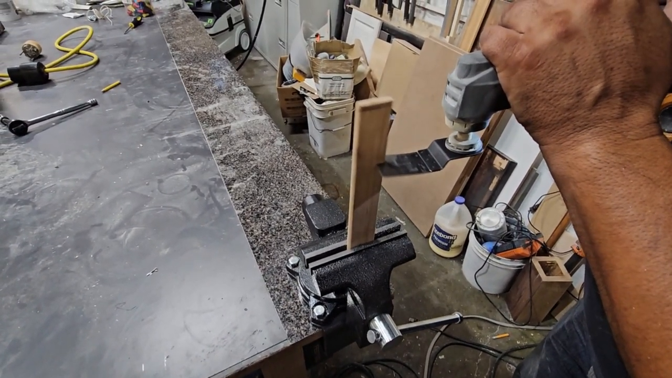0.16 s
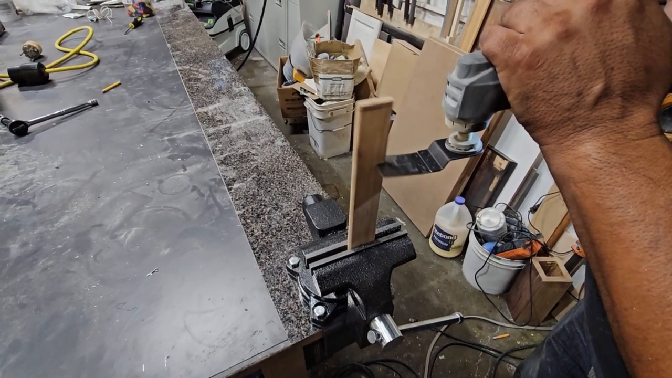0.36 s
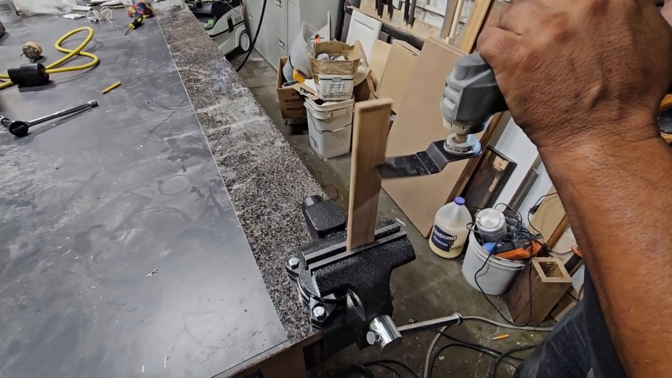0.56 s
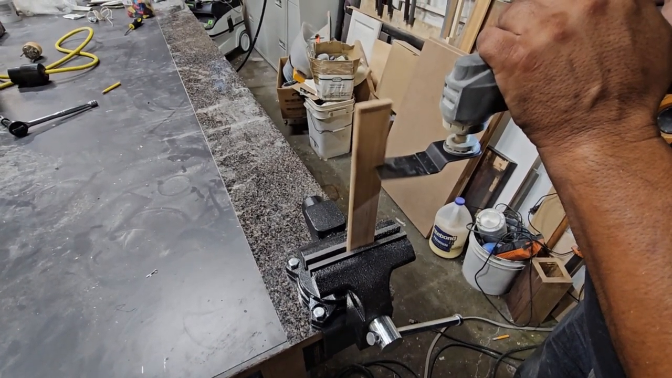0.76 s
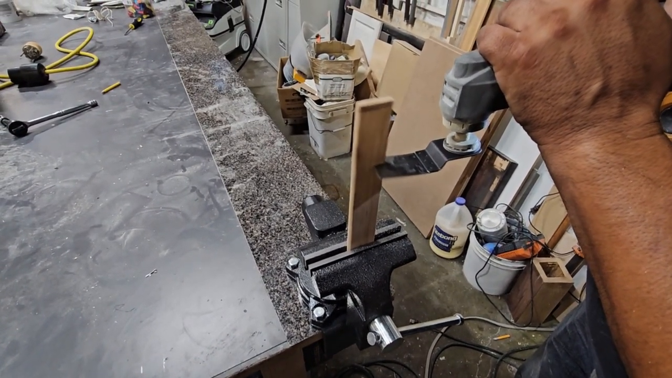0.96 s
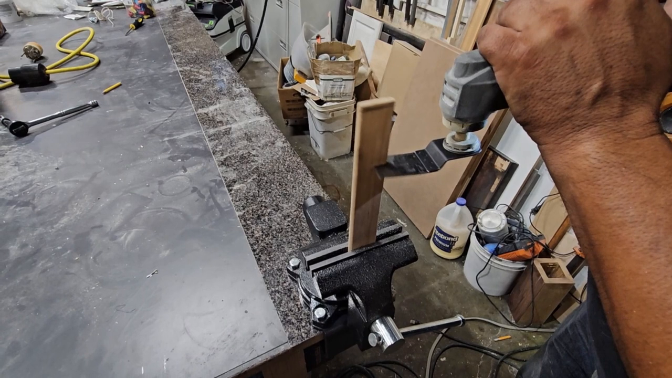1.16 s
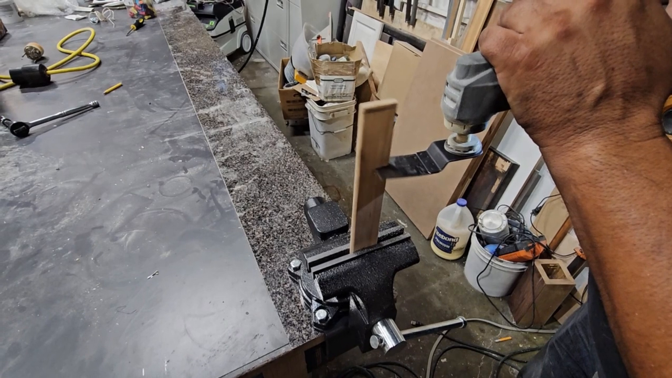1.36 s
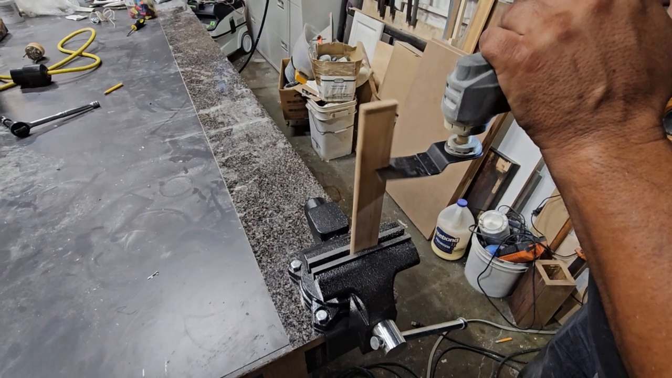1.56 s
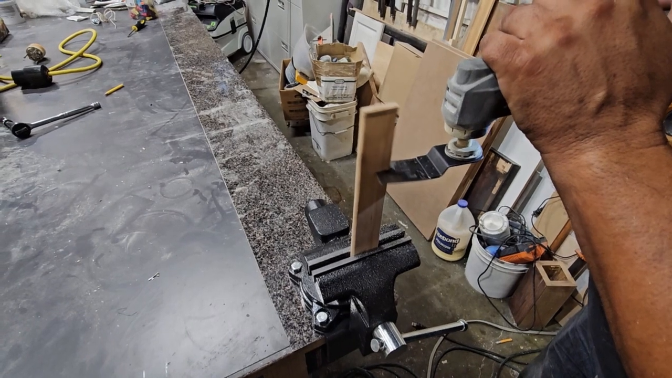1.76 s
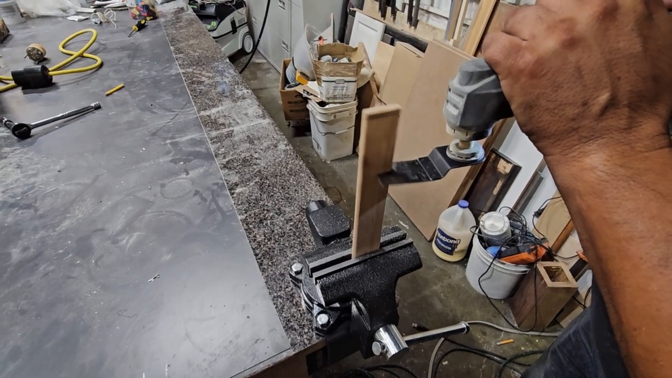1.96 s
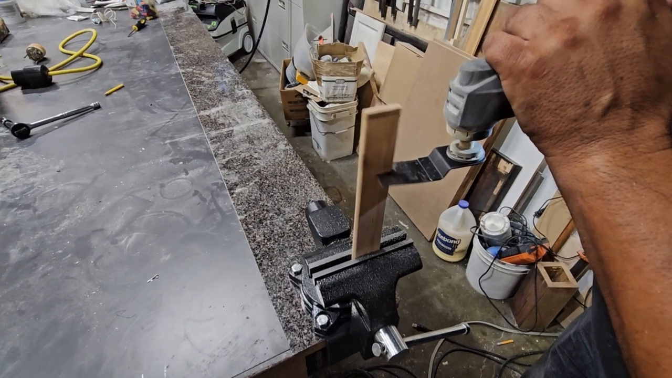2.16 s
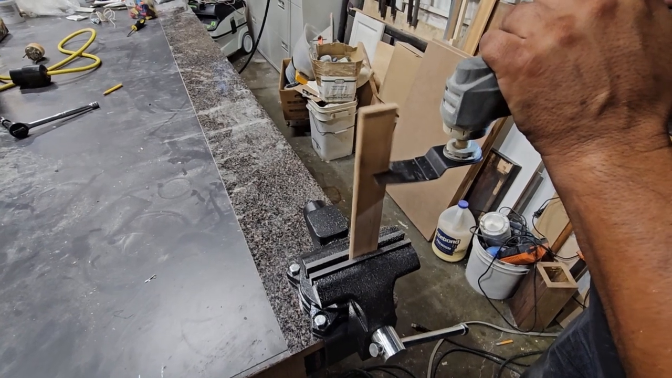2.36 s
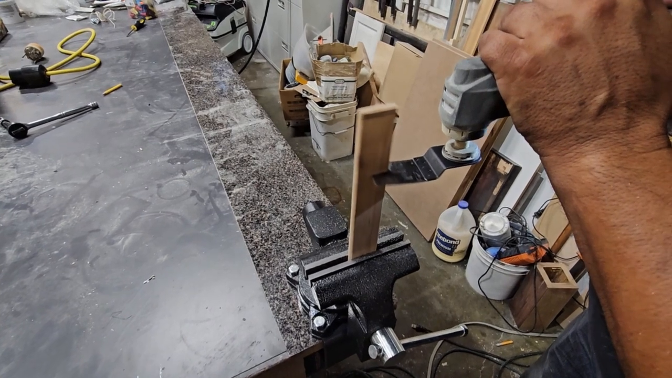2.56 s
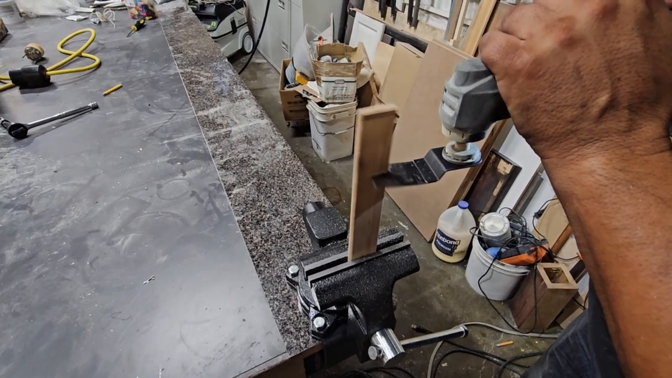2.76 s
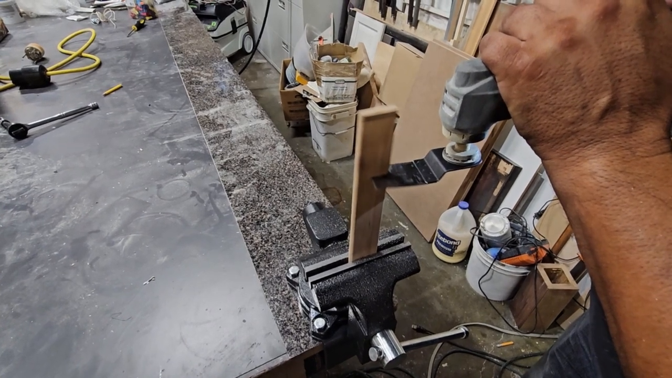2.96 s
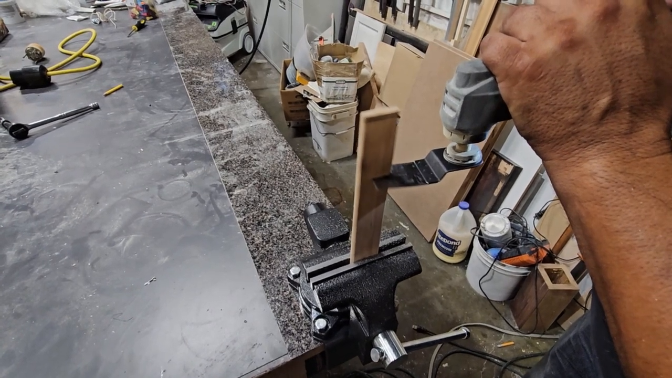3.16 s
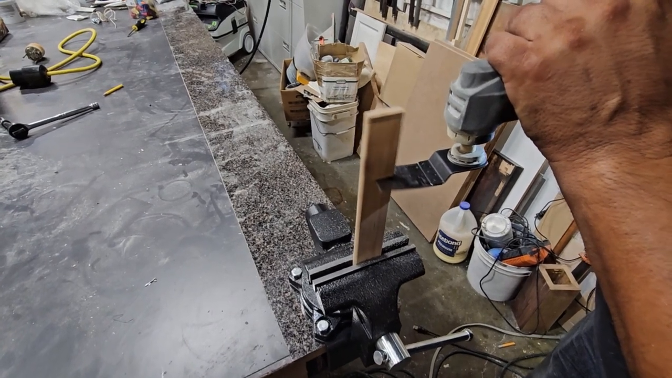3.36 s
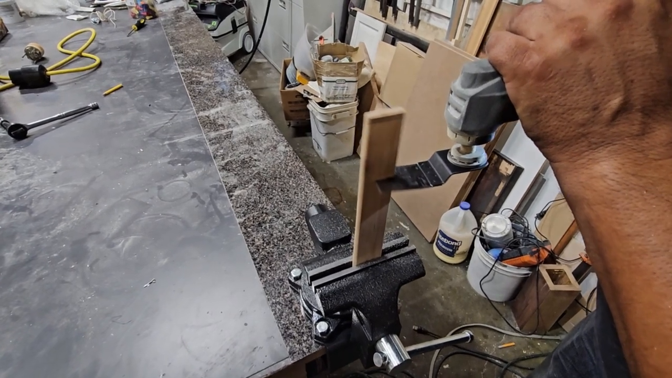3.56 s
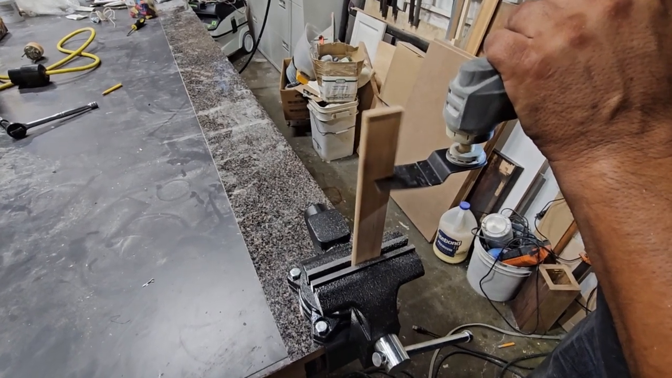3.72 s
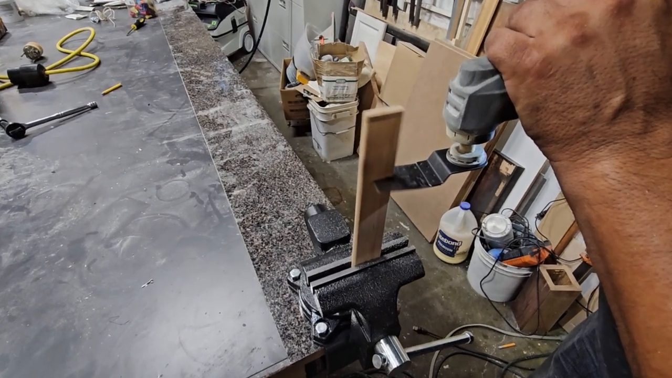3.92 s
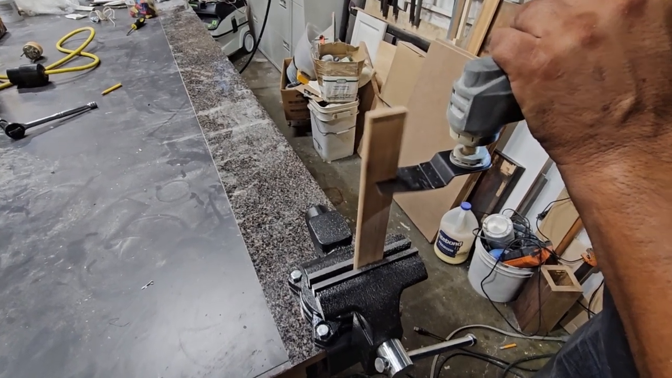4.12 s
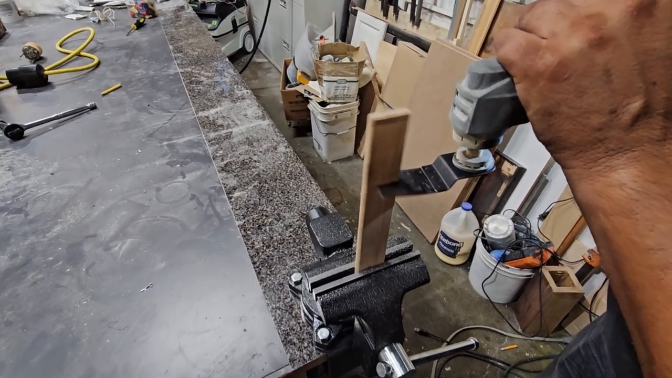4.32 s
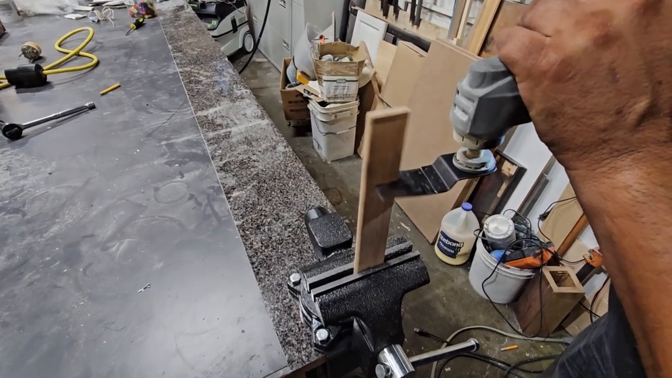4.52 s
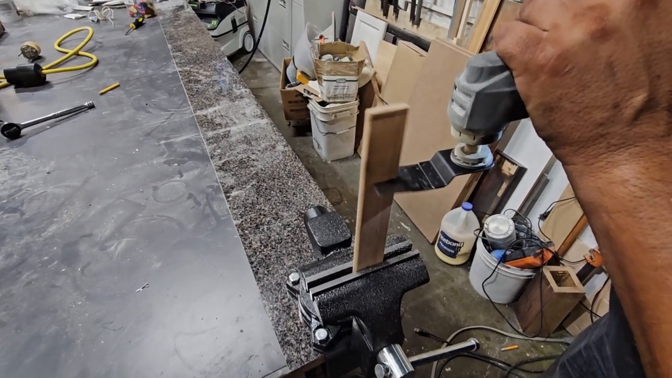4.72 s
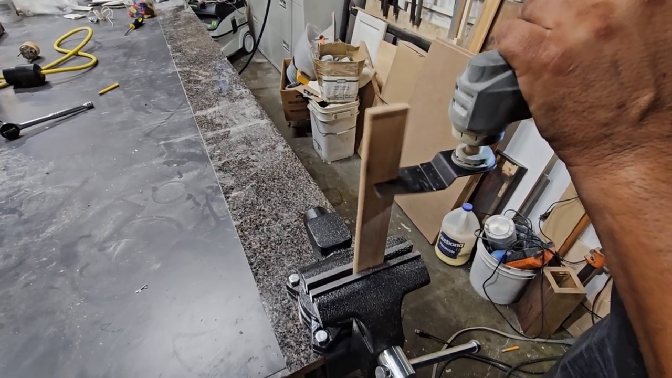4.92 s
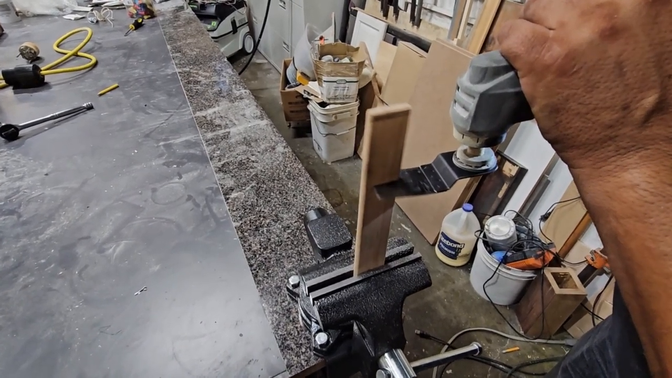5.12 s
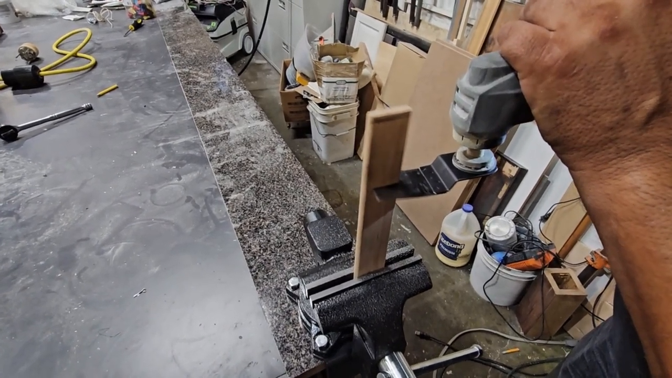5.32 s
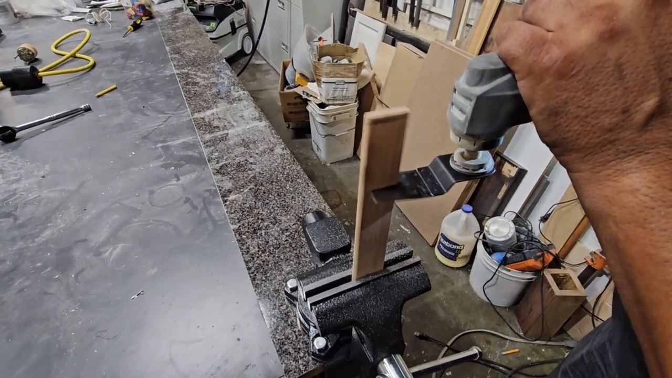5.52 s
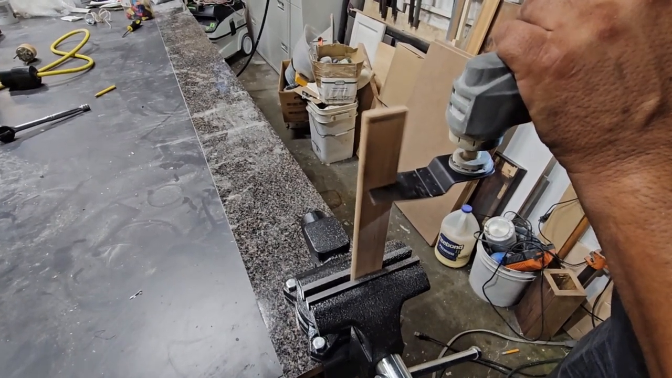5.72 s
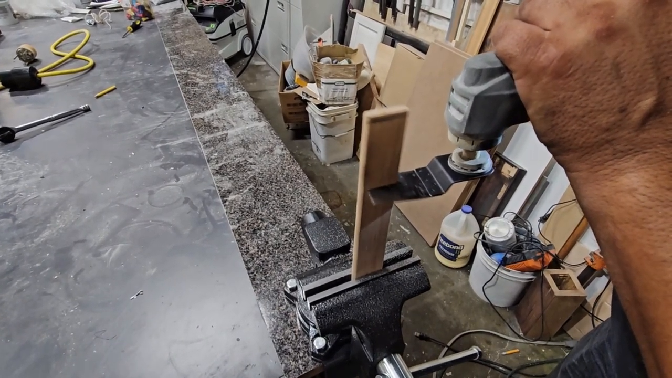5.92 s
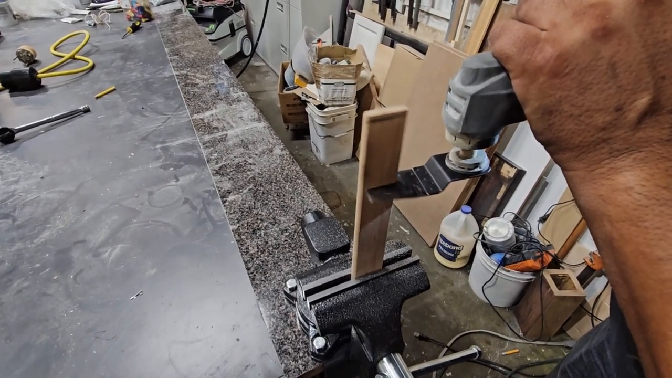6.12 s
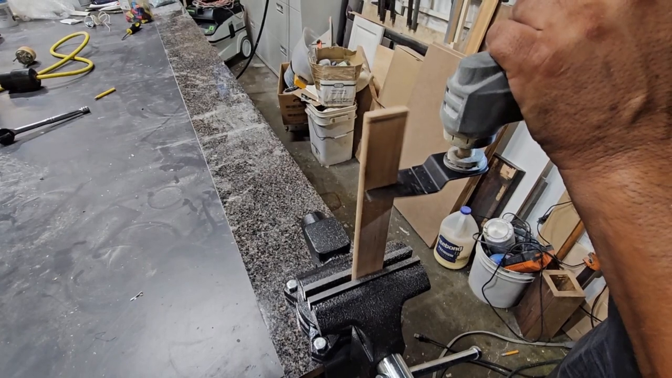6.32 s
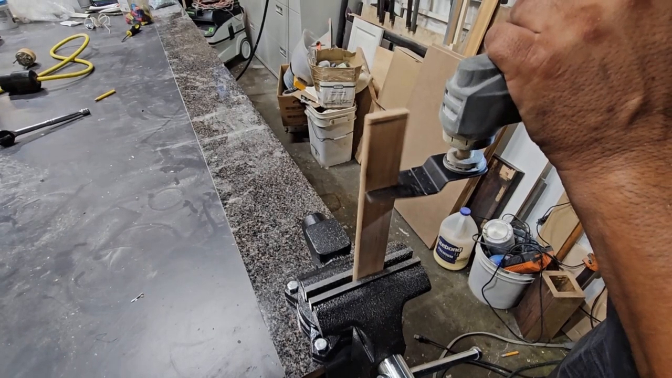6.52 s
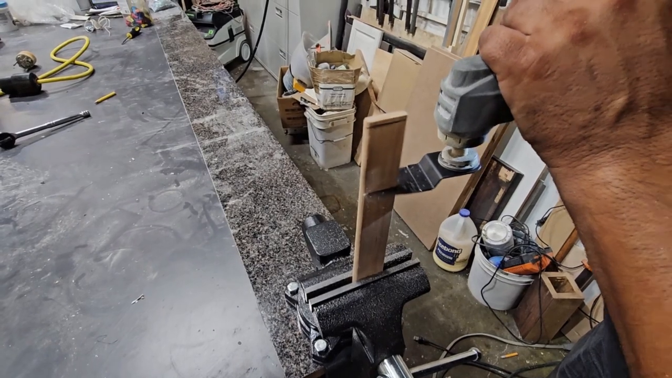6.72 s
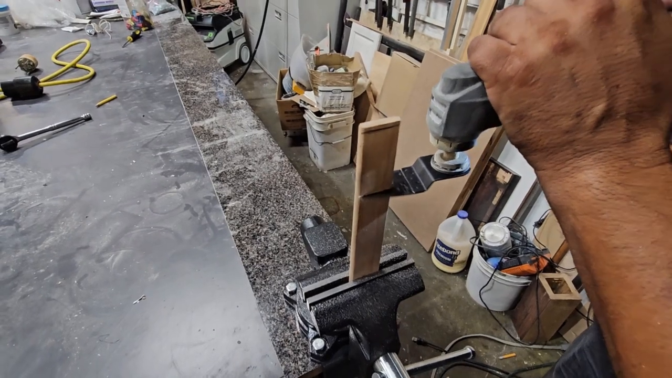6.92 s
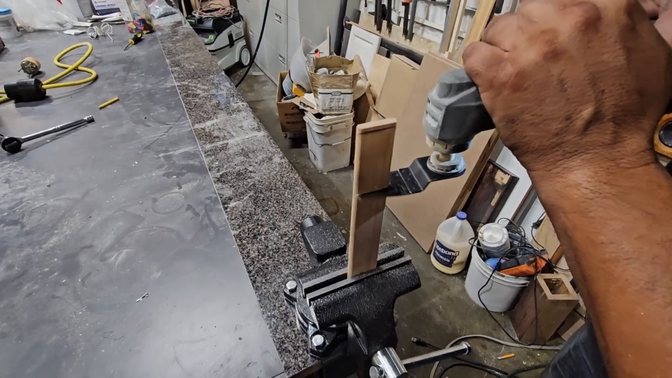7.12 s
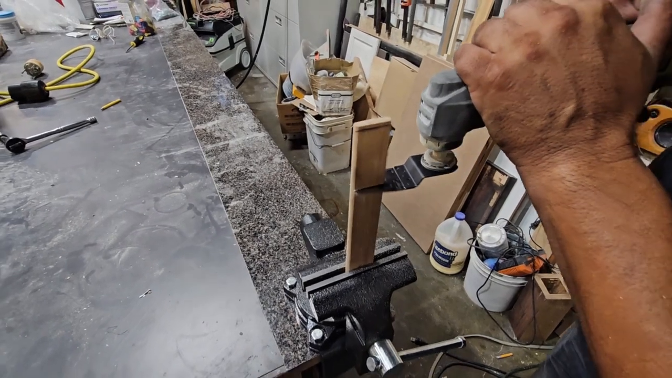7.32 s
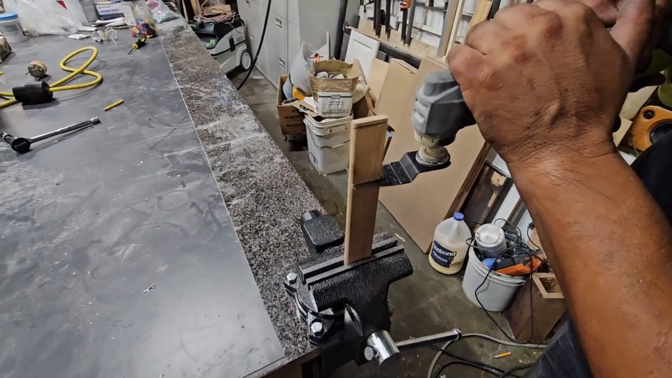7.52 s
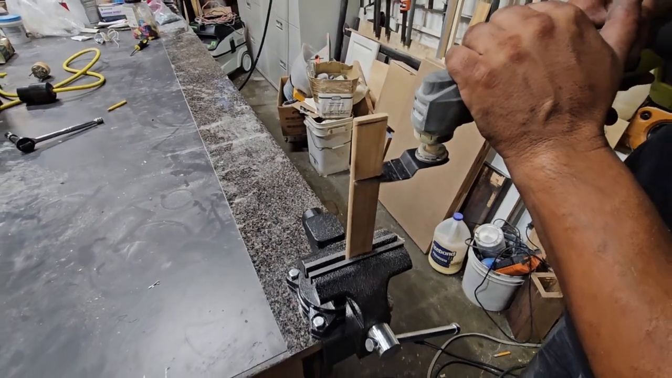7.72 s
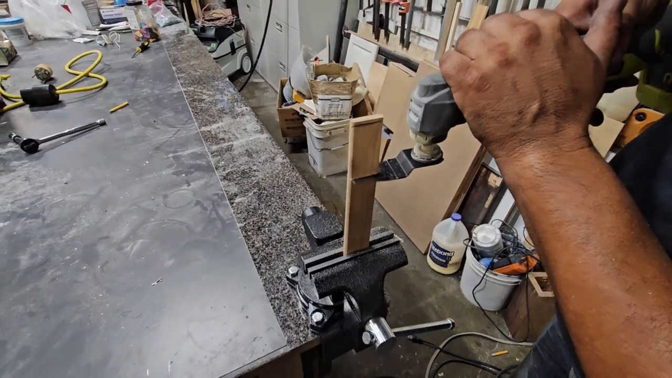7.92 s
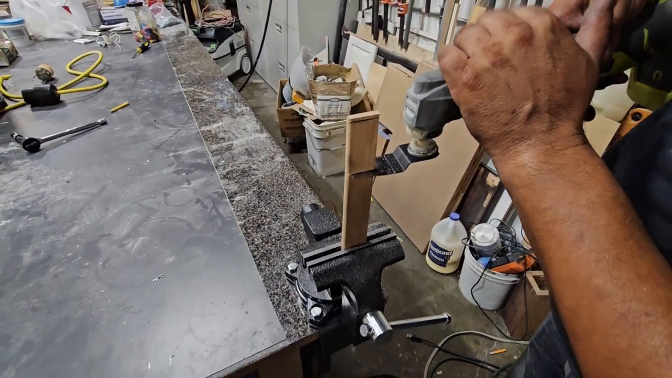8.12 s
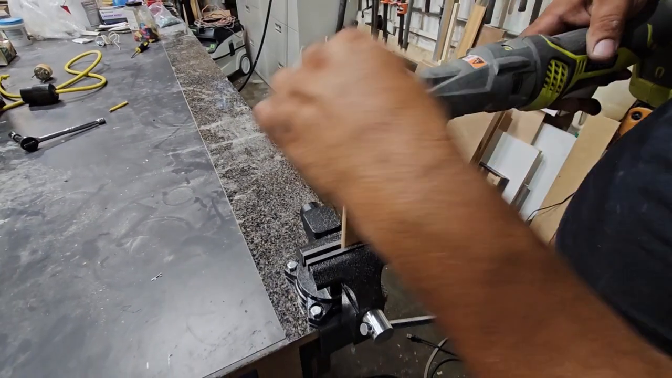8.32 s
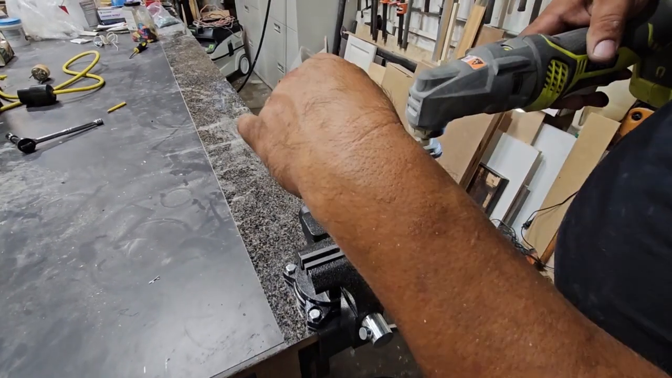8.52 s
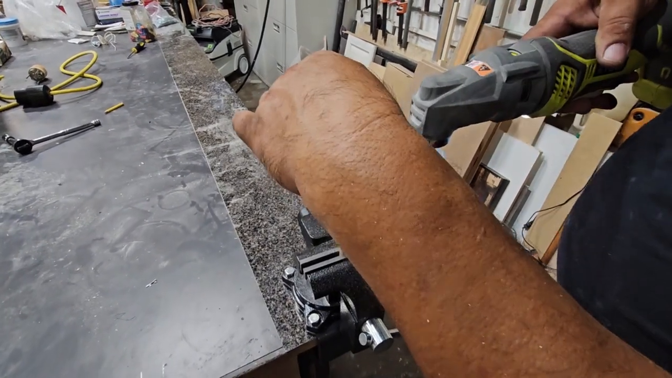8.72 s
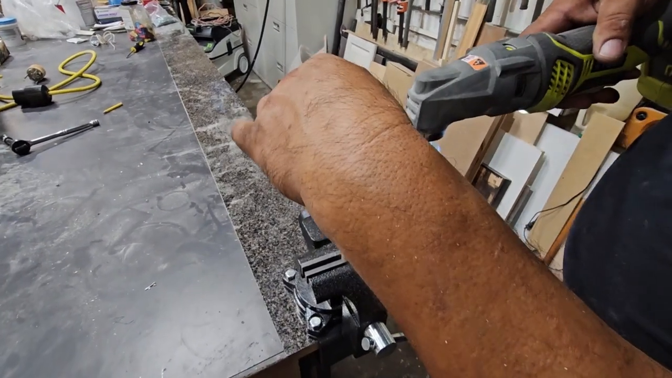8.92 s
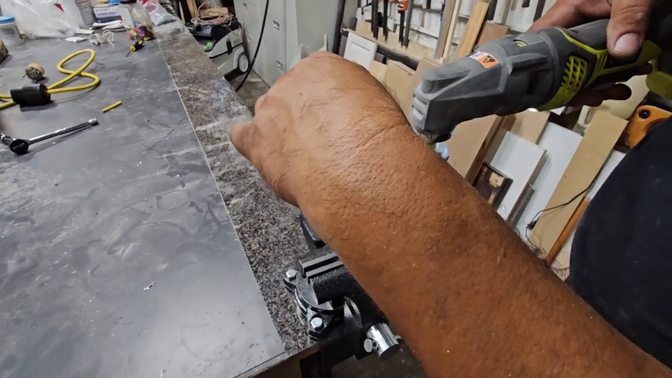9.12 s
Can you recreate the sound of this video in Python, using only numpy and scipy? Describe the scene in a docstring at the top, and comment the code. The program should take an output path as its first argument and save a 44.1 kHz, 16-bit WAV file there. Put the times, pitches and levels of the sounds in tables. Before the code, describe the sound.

A close stereo microphone catches a harsh electric rasp: fast blade strokes, hissing teeth and a humming wooden slat, with dull thuds through the bench. The bright ringing gradually sinks in pitch. After about six and a half seconds the blade comes loose, buzzes hollowly and coasts down. A brief quiet with faint clicks ends when the motor abruptly spins up again, unloaded, in a dry small room.

```python
"""In a small workshop, close by, an oscillating multi-tool saws into a wooden slat held in a vise.
The blade swings about 250 times a second: pulses and scraping noise pass through sliding resonances
for the rasp, and waves at the swing rate make the slat hum. The resonances mostly sink as it goes deeper.
The blade comes free, the motor coasts towards a stop, and the tool starts again in the air.
Thuds, squeals, rings, small clicks and a quiet room tone are added around the sawing."""
import sys
import numpy as np
from scipy import signal
from scipy.fft import rfft, irfft, next_fast_len
from scipy.io import wavfile
from scipy.ndimage import uniform_filter1d

SR = 44100
rng = np.random.default_rng(int(sys.argv[2]) if len(sys.argv) > 2 else 0)


def generate_wav(sig):
    """Save sig (samples, or channels by samples) to the path in sys.argv[1] as 16-bit PCM at SR."""
    pcm = np.round(np.clip(np.atleast_2d(sig).T, -1, 1) * 32767).astype(np.int16)
    wavfile.write(sys.argv[1], SR, pcm)


N = 408807
TIME = np.arange(N) / SR
BINS = np.fft.rfftfreq(512, 1 / SR)  # Hz


def gain_of(db):
    """Turns decibels into amplitude."""
    return 10 ** (np.asarray(db) / 20)


def evened(x):
    """Scales to an rms of 1."""
    return x / np.sqrt(np.mean(x ** 2) + 1e-20)


def follow(rows, t=TIME):
    """Reads each column of a curve at the times t, with straight lines between its points."""
    s, *columns = np.transpose(rows)
    return np.array([np.interp(t, s, c) for c in columns])


def read(points, hz):
    """Reads a spectrum with straight lines along a logarithmic pitch axis."""
    f, value = np.transpose(points)
    return np.interp(np.log(hz + 1), np.log(f + 1), value)


def coloured(x, points):
    """Filters x by a spectrum in dB, then scales it to an rms of 1."""
    size = next_fast_len(N)
    gain = gain_of(read(points, np.fft.rfftfreq(size, 1 / SR)))
    return evened(irfft(rfft(x, size) * gain, size)[..., :N])


def wander(rate_hz):
    """Makes a smooth random curve of rms 1, with changes up to about the given rate."""
    lowpass = signal.butter(2, rate_hz, fs=SR, output="sos")
    return evened(signal.sosfilt(lowpass, rng.standard_normal(N)))


def patches(shape, size):
    """Smooth chance over frequency and time, rms 1; size is (bins, frames)."""
    smooth = uniform_filter1d(rng.standard_normal(shape), size[0], axis=0)
    return evened(uniform_filter1d(smooth, size[1], axis=1))


def gate(t, start, end, edge_s):
    """Rises to 1 around start, holds, and falls around end."""
    return np.clip(.5 + np.minimum(t - start, end - t) / edge_s, 0, 1)


def held(events, edge_s, t):
    """Each event holds its values from its start to its end; one curve per column."""
    return sum(np.outer(values, gate(t, start, end, edge_s)) for start, end, *values in events)


# the hand pushes the blade into the wood:
# (start t/s, end t/s, pressure with 1 = firm, chatter 0-1, extra hiss level/dB, extra thud level/dB)
PUSHES = [(-0.1, 0.36, 0.35, 0.27, -1.5, -5), (0.36, 0.7, 0.83, 0.43, -2, 2),
          (0.7, 1.45, 0.42, 0.69, 0.5, 11.5), (1.45, 2.16, 0.62, 0.65, 0, 2.5),
          (2.16, 2.36, 0.21, 0.1, 0, 8), (2.36, 3.04, 0.75, 0.57, 0, 2), (3.27, 3.7, 0.48, 0.65, 2, 2),
          (3.7, 4.41, 0.45, 0.25, 2.5, 3), (4.41, 4.56, 1.09, 0.73, 0.5, -4),
          (4.56, 4.72, 0.32, 0.5, 2, -4), (4.8, 4.98, 0.1, 0.4, 1, 1), (4.98, 5.11, 0.73, 0.85, 1.5, 8),
          (5.17, 5.53, 0.2, 0.16, 3, -5), (5.55, 5.73, 0, 0.46, -3, -3), (5.75, 6.2, 0.62, 0.72, 0.5, 7),
          (6.2, 6.57, 0.23, 0.26, 1, 7)]
PUSH_EDGE_S = .07


def pressure(t=TIME):
    """How hard the hand pushes: 0 is not at all, 1 is firmly."""
    return held(PUSHES, PUSH_EDGE_S, t)[0]


# the motor without load races as the blade leaves the cut, then is throttled back: (t/s, swing rate f/Hz)
THROTTLE = [(6.57, 251), (6.66, 255), (6.87, 259), (6.97, 232), (7.05, 229)]
# soft start, then full power: (t/s, swing rate f/Hz)
SPIN_UP = [(8.533, 1), (8.57, 55), (8.65, 110), (8.75, 160), (8.85, 197), (8.88, 240), (8.93, 256),
           (9, 260.5)]
SAG_HZ = 7  # speed lost per unit of pressure
OFF_S, COAST_S, FRICTION_HZ = 7.283, .565, 15
ON_S, FREE_HZ = 8.533, 260.5


def swing_rate(t=TIME):
    """Swings per second: the motor sags under load, coasts against friction when off, and spins up again."""
    driven = follow(THROTTLE, t)[0] - SAG_HZ * pressure(t)
    coasting = (driven + FRICTION_HZ) * np.exp(-np.maximum(t - OFF_S, 0) / COAST_S) - FRICTION_HZ
    return np.maximum(np.where(t < ON_S, coasting, follow(SPIN_UP, t)[0]), 1)


# how far the blade has come free: (t/s, free share 0-1)
FREED = [(0, 0.17), (4, 0.07), (5.5, 0.16), (6.7, 0.65), (8.6, 0.57)]
# the loose blade rattles: (start t/s, end t/s, level/dB, chatter 0-1)
RATTLES = [(6.63, 6.73, 1.5, 0.8), (6.73, 6.93, 3, 0.4), (7.08, 7.27, 0.5, 0.13), (7.28, 7.39, 1.5, 0.2),
           (7.4, 7.445, 7.5, 0.3), (7.49, 7.56, 2, 0.4), (7.66, 7.77, 3, 0.4), (7.84, 7.92, 6, 0.3),
           (8.8, 8.96, 5.5, 0.55), (9.08, 9.16, 4, 0.16)]
RATTLE_EDGE_S = 0.022
STEADY_BURIED, STEADY_FREE = .68, 0.76  # at full speed: 0 = the teeth chatter, 1 = every swing is alike


def steadiness(t=TIME, slowing=0.69):
    """How alike the swings are, 0-1: most for a free, fast blade; pushes and rattles make it chatter."""
    calm = STEADY_BURIED + (STEADY_FREE - STEADY_BURIED) * follow(FREED, t)[0]
    calm = calm * (1 - held(PUSHES, PUSH_EDGE_S, t)[1])
    calm = calm * (1 - held(RATTLES, RATTLE_EDGE_S, t)[1])
    return np.clip(calm * (swing_rate(t) / FREE_HZ) ** slowing, .01, .98)


def strokes(turns, size):
    """One sharp pulse, at its exact place, each time turns passes a whole number."""
    at = np.flatnonzero(np.diff(np.floor(turns)) > 0)
    late = (np.ceil(turns[at]) - turns[at]) / (turns[at + 1] - turns[at])  # fraction of a sample
    near, out = np.arange(-8, 9), np.zeros(N)
    pulse = np.sinc(near - late[:, None]) * np.hanning(len(near))
    np.add.at(out, np.clip(at[:, None] + near, 0, N - 1), size[at, None] * pulse)
    return out


# the loosened blade bounces on every other swing: (t/s, strong-weak depth 0-1)
LIMP = [(6.55, 0), (6.7, 0.31), (6.9, 0.18), (7.1, 0.38), (7.4, 0.14), (7.6, 0.08)]
SCRAPE_S = .0014  # how quickly a burst of scraping fades


def teeth(turns, speed, back=0.042, lag=.46, uneven_db=0.5, drag=1.0, flutter_db=1.5, sharp_hz=90):
    """The blade strikes at each end of its swing: a regular buzz, and an uneven burst of scraping."""
    # a slow blade strikes more weakly
    per_swing = np.sqrt(SR / speed / (1 + back ** 2)) * np.minimum(speed / sharp_hz, 1)
    per_swing = per_swing * (1 + follow(LIMP)[0] * np.cos(np.pi * turns))
    buzz = strokes(turns, per_swing) + back * strokes(turns + lag, per_swing)
    bite = gain_of(uneven_db * np.clip(rng.standard_normal(N), -2, 2)) * per_swing
    blows = strokes(turns, bite) ** 2 + strokes(turns + lag, 2.4 * bite) ** 2
    bursts = signal.lfilter([1], [1, -np.exp(-2 / (SCRAPE_S * SR))], blows)
    bursts = bursts / (abs(uniform_filter1d(bursts, size=SR // 8)) + 1e-9)
    rubbing = drag * (speed / FREE_HZ) ** .15  # less at low speed, so each reversal ticks separately
    scrape = np.sqrt((bursts + rubbing) / (1 + rubbing)) * rng.standard_normal(N)
    return buzz, evened(scrape * gain_of(flutter_db * wander(50)))


# resonances of the slat and of the blade, one track for each: (t/s, f/Hz, height level/dB)
SLAT_MODES = [
    [(0, 1260, 6.5), (3.6, 1110, 12), (3.75, 1053, 12.5), (5.05, 1050, 12), (5.2, 780, 9.5),
     (6.1, 768.4, -14), (6.25, 808.6, 4), (6.65, 658, 5), (7.9, 590, 17), (8.85, 561.4, 10),
     (9.05, 769.6, 1)],
    [(0, 1440, 8), (3, 1320, 5), (4.2, 1330, 8)],
]
BLADE_MODES = [
    [(0, 3200, 13), (0.7, 3240, 16.5), (1.3, 3095, 18), (3, 2750, -1)],
    [(0, 3380, 14), (1, 3040, 8.3), (2, 3043, 16), (3.3, 3025, 16.5), (5.1, 2855, 12.2), (5.3, 2598, 7.8),
     (5.55, 2843, 7.6), (6.8, 2502, 4.8)],
    [(0, 6330, 14.5), (1, 5360, 13.7), (2, 4810, 13.7), (3, 4760, 11.5), (4, 4420, 1.9), (5, 4266, 4),
     (6.3, 3870, 2.98), (6.8, 3480, 8.2), (7.5, 3607, 17), (8.2, 3646, 7.9), (8.7, 3400, 3.4),
     (9.1, 3598, 9)],
    [(0, 5440, 5), (1.7, 5600, 2), (3, 5304, 9), (5.45, 5330, 7), (6, 5400, -5), (7.9, 5140, -3),
     (8.6, 4250, 7.5), (9.27, 4416, 7.5)],
    [(0, 7500, 13.3), (1, 7110, 15.2), (4.5, 7280, 12), (5.8, 7200, 5.7), (6.2, 7880, 9.7), (8, 8290, 9.3),
     (8.6, 7600, 9.4)],
    [(0, 9620, 13.5), (1.4, 9440, 20), (3, 9300, 13), (5, 8720, 5), (6.5, 8960, -10)],
    [(0, 10860, 11), (1.2, 10800, 4), (2.5, 10400, 13), (4.8, 10200, 15), (5.3, 10510, -3),
     (6.4, 10190, 10), (7, 10020, 10.5), (7.9, 9793, 15.5), (8.6, 10360, -13.5)],
    [(2, 12100, -4), (3.9, 11700, 10.5), (5.2, 11420, -8)],
]
# colour under the resonances, blade buried and blade free: (f/Hz, level/dB)
BURIED = [(250, -14), (400, -47.5), (500, 5), (600, -3.5), (780, 1.5), (1000, -8.5), (1450, -1.5),
          (1600, -9), (1820, -4), (1980, -0.5), (2300, 2), (4000, -3), (11000, 1), (13000, 0.5),
          (15000, -4), (15600, 9.5)]
FREE = [(70, -4), (125, 6), (230, -7), (345, 22), (520, 1.5), (900, 16), (1700, 1), (2300, -3.5),
        (2800, -0.5), (5500, 3.5), (6700, 0.5), (9000, 3.5), (11500, 1.5), (14500, -1.5), (15600, 0.5)]


def ringing(t, slat_width_hz=105, blade_width_hz=75, damping=0.023):
    """Gain of slat and blade over frequency and time; the resonances slide with the depth of the cut."""
    hz, free = BINS[:, None], follow(FREED, t)[0]
    power = 1
    for track in SLAT_MODES + BLADE_MODES:
        centre, height_db = follow(track, t)
        width = slat_width_hz if track in SLAT_MODES else blade_width_hz + damping * centre
        power = power + gain_of(height_db) ** 2 / (1 + ((hz - centre) / width) ** 2) ** 2
    colour_db = (1 - free) * read(BURIED, hz) + free * read(FREE, hz)
    return np.sqrt(power) * gain_of(colour_db)


# one row each for the knock of the slat, the rasp of the blade and the hiss of the teeth, before a trim:
# (buried level/dB, free level/dB, level/dB more at the surface, level/dB more per unit of pressure,
# level/dB per tenfold speed, share of a rattle's level, swing rate f/Hz below which it dies)
VOICES = [(-29.5, -26, 1, 3.5, 24.5, 0.82, 47), (-25.5, -21, 2.5, 3, 31, 0.87, 57),
          (-26, -18.5, 4.5, 4.5, 32.5, 1, 62)]
# the teeth snag (+) or slip (-) for a moment: (t/s, level/dB)
SNAGS = [(1.37, -8), (1.565, -4), (1.7, -6), (2.24, 0), (2.46, 5.5), (2.63, -3), (2.775, 1), (2.877, 6),
         (2.915, -14), (3.19, 4), (3.23, -6), (4.25, -5)]
SNAG_S, SNAG_RASP_SHARE = 0.011, .5  # snags move the rasp less than the hiss
SINK_S = 3.64  # the wood muffles the blade as it sinks in
START_DB, START_RISE_S = 4.5, 0.019  # the starting torque jolts the gears
STALL_STEEPNESS = 7.2


def voice_levels(t):
    """Levels in dB of knock, rasp and hiss: they grow with speed, pressure and rattling."""
    columns = np.transpose(VOICES)[:, :, None]
    buried_db, free_db, surface_db, pressed_db, speed_db, rattle_share, stall_hz = columns
    push, _, hiss_db, _ = held(PUSHES, PUSH_EDGE_S, t)
    speed, rattle_db = swing_rate(t), held(RATTLES, RATTLE_EDGE_S, t)[0]
    db = buried_db + (free_db - buried_db) * follow(FREED, t)[0] + surface_db * np.exp(-t / SINK_S)
    jolt = np.maximum(t - ON_S, 0) / START_RISE_S
    db += pressed_db * push + rattle_share * rattle_db + START_DB * jolt * np.exp(1 - jolt)
    snag_db = sum(size_db * np.exp(-((t - s) / SNAG_S) ** 2) for s, size_db in SNAGS)
    db[1] += SNAG_RASP_SHARE * snag_db
    db[-1] += hiss_db + snag_db
    stalling = (t < ON_S) * (stall_hz / speed) ** STALL_STEEPNESS
    return db + speed_db * np.log10(speed / FREE_HZ) - 20 * np.log10(1 + stalling)


# borders of the knock, rasp and hiss bands: (f/Hz)
BAND_EDGES = [420, 1800, 6000, 16000]


def pressed(gain, t, trim_db=(0, 3, 1)):
    """Sets knock, rasp and hiss to their levels, with smooth slopes between them."""
    bands = zip(BAND_EDGES, BAND_EDGES[1:])
    power = np.array([(gain[(BINS > lo) & (BINS < hi)] ** 2).sum(0) / len(BINS) for lo, hi in bands])
    lift_db = voice_levels(t) + np.array(trim_db)[:, None] - 10 * np.log10(power)
    # 0 = knock, 1 = rasp, 2 = hiss; values between them blend two neighbours
    place = read([(1400, 0), (2200, 1), (5000, 1), (7500, 2)], BINS)
    share = np.maximum(1 - abs(place[:, None] - np.arange(len(power))), 0)
    return gain * gain_of(share @ lift_db)


# low harmonics keep their line where the treble blurs: (f/Hz, level/dB in favour of buzz over scrape)
PURITY = [(250, -4), (750, 4.5), (1250, 3), (1900, 1.5), (2900, -0.5), (5500, -3.5), (8000, -7),
          (14000, -9)]
BUZZ_WAVER_DB = 2.5


def blade(turns, speed, patchy_db=2.5, apart=0.32, dispersion=0.6026):
    """Buzz and scrape ring the blade and the slat; the high treble leans towards scrape."""
    buzz, scrape = teeth(turns, speed)
    # noise with the scrape's own loudness sets the two sides apart
    dust = rng.standard_normal(N) * np.sqrt(abs(uniform_filter1d(scrape ** 2, size=24)))
    _, t, spectra = signal.stft(np.array([buzz, scrape, dust]), SR, nperseg=512, noverlap=384)
    buzz, scrape, dust = spectra
    steady = steadiness(t)
    odds = steady / (1 - steady) * gain_of(read(PURITY, BINS))[:, None] ** 2
    common, split = np.sqrt(1 - apart) * scrape, np.sqrt(apart) * dust
    rough = np.array([common + split, common - split])
    # each bite favours other resonances, and the harmonics waver as the hand shifts
    rough = rough * gain_of(patchy_db * patches(buzz.shape, size=(18, 7)))
    buzz = buzz * gain_of(BUZZ_WAVER_DB * patches(buzz.shape, size=(5, 40)))
    # bending waves travel more slowly at low pitch, which smears each strike
    buzz = buzz * np.exp(-1j * dispersion * np.sqrt(BINS))[:, None]
    mixed = (np.sqrt(odds) * buzz + rough) / np.sqrt(1 + odds)
    return signal.istft(mixed * pressed(ringing(t), t), SR, nperseg=512, noverlap=384)[1][:, :N]


SLAT_HUM_DB, SLAT_PRESSED_DB = -19, 3  # hum of the slat, and its rise per unit of pressure
WITHDRAW_S, WITHDRAW_DB_PER_S = 5.89, 20.5  # the slat's hum fades as the blade is drawn out
HOUSING_HZ, HOUSING_WIDTH_HZ, HOUSING_DB = 257.7, 9.4, -27  # the tool's own hum peaks near top speed
UNBALANCE_DB = -46  # the swinging blade shakes the tool


def hum_strength(speed):
    """The slat hums while it grips the blade; the housing hums most when the speed nears its resonance."""
    withdrawn_db = WITHDRAW_DB_PER_S * np.maximum(TIME - WITHDRAW_S, 0)
    slat = gain_of(SLAT_HUM_DB + SLAT_PRESSED_DB * pressure() - withdrawn_db)
    housing = gain_of(HOUSING_DB) / np.hypot(1, (speed - HOUSING_HZ) / HOUSING_WIDTH_HZ)
    return np.sqrt(slat ** 2 + housing ** 2 + gain_of(UNBALANCE_DB) ** 2)


def hum(turns, speed, chatter, shake=0.08, slip=0.16, octave_db=-32, sway_hz=220, sway_db=-17, limp_db=-27):
    """The slat swings with the blade like a loudspeaker cone; chatter shakes it and wakes its own sway."""
    angle = 2 * np.pi * turns + slip * chatter * wander(21)
    wave = np.sqrt(2) * (np.cos(angle) + gain_of(octave_db) * np.cos(2 * angle))
    sway = ((wander(3.0) + 1j * wander(6.7)) * np.exp(2j * np.pi * sway_hz * TIME)).real
    # bouncing on every other swing adds the half and one-and-a-half orders
    bounce = gain_of(limp_db) * follow(LIMP)[0] * (1 + .5 * wander(12.0))
    halves = bounce * (np.cos(angle / 2) + np.cos(1.5 * angle))
    shaken = (1 + shake * chatter * wander(26.0)) * wave
    return hum_strength(speed) * (shaken + gain_of(sway_db) * chatter * sway) + halves


# strength of 1, 2, 3.. times the swing rate in the whine, before colour and speed: (level/dB)
GEAR_ORDERS_DB = [-34, -26, -20, -26, -34, -31, -35]
# resonances of the housing: (f/Hz, level/dB)
GEAR_COLOUR = [(60, -12), (115, 1), (200, -12), (345, -4), (420, -8), (560, 2), (700, -7), (1700, -13)]
GEAR_STALL_HZ = 105  # while coasting, the whine dies below this swing rate


def gears(turns, speed, waver_db=3.0):
    """The bare drive whines; each multiple of the swing swells as it glides through a housing resonance."""
    whine = np.zeros(N)
    for k, db in enumerate(GEAR_ORDERS_DB, 1):
        level_db = db + read(GEAR_COLOUR, k * speed) + waver_db * wander(18)
        whine += gain_of(level_db) * np.sin(2 * np.pi * k * turns)
    stalling = (TIME < ON_S) * (GEAR_STALL_HZ / speed) ** STALL_STEEPNESS
    return np.sqrt(2) * whine * follow(FREED)[0] ** 3 * speed / FREE_HZ / (1 + stalling)


# colour of the thuds: (f/Hz, level/dB)
THUD_COLOUR = [(15, -18), (35, -8.5), (70, -1.5), (115, -4.5), (145, -14), (180, -3.5), (260, -0.5),
               (450, -42)]
# the tool bumps the slat: (t/s, level/dB)
BUMPS = [(0.77, -27.5), (1.43, -33), (2.365, -33.5), (5.965, -33), (6.65, -34.5), (6.915, -23.5),
         (7.5, -42.5)]
BUMP_RISE_S, BUMP_FADE_S = 0.0057, 0.022
THUD_DB, THUD_LIMP_DB = -45.5, 20.5  # base level, and its rise per unit of bounce depth
THUD_STALL_HZ = 52  # slower swings soon stop shaking the bench


def bench(speed, lumpy_db=7.5, apart=0.069, slowing=0.33):
    """Uneven bites thud through the vise into the bench, changed by pushes, bounces and bumps."""
    shaking = rng.standard_normal(N) + apart * rng.standard_normal((2, N))
    strength = gain_of(THUD_DB + held(PUSHES, PUSH_EDGE_S, TIME)[-1] + THUD_LIMP_DB * follow(LIMP)[0])
    strength = strength * (speed / FREE_HZ) ** slowing * np.minimum(speed / THUD_STALL_HZ, 1) ** 4
    lumps = evened(gain_of(lumpy_db * np.clip(wander(9.9), -2, 2)))
    bumps = np.zeros(N)
    for s, db in BUMPS:
        fade = np.exp(-abs(TIME - s) / BUMP_FADE_S)
        bumps += gain_of(db) * gate(TIME, s, np.inf, BUMP_RISE_S) * fade
    return (strength * lumps + bumps) * coloured(shaking, THUD_COLOUR)


# colour of the quiet room: (f/Hz, level/dB)
ROOM_TONE = [(18, -31.5), (30, 5), (125, -4.5), (645, -25.5), (1730, -40), (15000, -48)]


def room_tone(level_db=-54.5):
    """Steady coloured noise, partly shared by both sides, is the air of the room."""
    noise = rng.standard_normal(N) + .5 * rng.standard_normal((2, N))
    return gain_of(level_db) * coloured(noise, ROOM_TONE)


# the teeth catch in the wood, one catch after another, as the cut starts: (t/s, grip level/dB)
CATCHES = [(0.0454, -17), (0.0852, -18), (0.1266, -18), (0.161, -17.5), (0.2003, -15.5), (0.2395, -21),
           (0.282, -13.5), (0.338, -16.5), (0.397, -19), (0.458, -19), (0.533, -21.5), (0.612, -21.5)]
CATCH_HOLD_S, CATCH_EDGE_S = 0.021, 0.015
# deeper in, the catches become a lighter, even rocking: (t/s, grip level/dB before it wavers)
ROCKING = [(.6, -60.5), (.65, -20.5), (2.7, -27), (3.3, -28), (5.5, -42), (6.3, -100)]


def skipping(rate_hz=24.6, drift=0.96, uneven_db=2.0):
    """Strength of the blade's grip on the wood: separate catches, then a nearly regular rocking."""
    catches = sum(gain_of(db) * gate(TIME, s, s + CATCH_HOLD_S, CATCH_EDGE_S) for s, db in CATCHES)
    rocking = .5 + .5 * np.sin(2 * np.pi * rate_hz * TIME + drift * wander(3.5))
    return catches + gain_of(follow(ROCKING)[0] + uneven_db * wander(7)) * rocking


# each catch brings out steady tones: (f/Hz, level/dB relative to the grip)
CATCH_TONES = [(1215, 0), (1465, -11.5), (1960, -11.5)]


def catch_tones(skip, blur=0.86):
    """Clear tones sound while the teeth hold, and linger a little into the next catch."""
    keep = np.exp(-1 / (.008 * SR))  # fades over 8 ms
    level = signal.lfilter([1 - keep], [1, -keep], skip)
    tones = [gain_of(db) * np.sin(2 * np.pi * hz * TIME + blur * wander(22)) for hz, db in CATCH_TONES]
    return level * sum(tones)


# a harmonic of the swing locks on to a resonance and sings: (start t/s, end t/s, near f/Hz, level/dB)
SQUEALS = [(3.686, 4.959, 1000, -38), (5.134, 5.491, 2750, -18), (5.16, 5.416, 3000, -15),
           (6.18, 6.603, 750, -19.5), (6.244, 6.582, 3750, -23.5), (8.88, 8.95, 500, -23.5),
           (8.932, 9.301, 780, -19.5), (5.2, 5.418, 2500, -28), (5.25, 5.5, 2250, -37),
           (9.203, 9.308, 2600, -25)]


def squeals(turns, speed, waver_db=1.0, edge_s=0.052):
    """Blade or slat rings on the multiple of the swing rate that lies nearest to its resonance."""
    out = np.zeros(N)
    for start, end, hz, db in SQUEALS:
        multiple = np.round(hz / np.interp((start + end) / 2, TIME, speed))
        tone = np.sqrt(2) * np.sin(2 * np.pi * multiple * turns)
        out += gain_of(db) * gate(TIME, start, end, edge_s) * tone
    return out * gain_of(waver_db * wander(27))


# the rattling blade keeps a narrow resonance ringing:
# (start t/s, end t/s, f/Hz, width f/Hz, starting level/dB before it wavers, fade in dB per s)
RINGS = [(6.59, 6.72, 154.2, 8.1, -33, 21), (7.39, 7.452, 3558, 46, -30, 4),
         (7.47, 7.96, 3588, 28, -34, 28)]
RING_EDGE_S = 0.011


def rings(waver_db=9.0):
    """Narrow resonances of blade and housing, struck unevenly: they hold their pitch as the speed changes."""
    out = np.zeros(N)
    for start, end, hz, width, db, fade_db in RINGS:
        level_db = db - fade_db * np.clip(TIME - start, 0, end - start) + waver_db * wander(width)
        level = gate(TIME, start, end, RING_EDGE_S) * gain_of(level_db)
        out += level * np.sqrt(2) * np.sin(2 * np.pi * hz * TIME + wander(width))
    return out


# small clicks of the handled tool: (t/s, level/dB relative to one another)
CLICKS = [(8.333, -45), (8.435, -52), (8.472, -57)]


def clicks(level_db=-4, snap_s=.003):
    """Each click is a short snap of the plastic housing: a fading burst of coloured noise."""
    envelope = sum(gain_of(db) * (TIME >= s) * np.exp(-abs(TIME - s) / snap_s) for s, db in CLICKS)
    noise = coloured(rng.standard_normal(N), [(600, -18), (1500, 6), (4000, 2), (12000, -26)])
    return gain_of(level_db) * envelope * noise


SWITCH_S = 8.529


def switch_on(hz=1975, level_db=-55, fade_s=0.03):
    """The chopped drive current sings briefly in the motor before it gathers speed."""
    t = np.maximum(TIME - SWITCH_S, 0)
    partials = [(1, 0), (2, 1), (3, -14), (4, -5)]  # (multiple, dB)
    tones = sum(gain_of(db) * np.sin(2 * np.pi * k * hz * t) for k, db in partials)
    return gain_of(level_db) * np.exp(-t / fade_s) * tones


def workshop(x, t60=0.13, wet_db=-8, shift_hz=1.7):
    """Dense, short reflections for each side; two sets fade into each other at a steady slow rate."""
    t = np.arange(SR // 3) / SR
    present = (rng.random((2, 2, len(t))) < .08) * (t > .002)
    taps = rng.standard_normal((2, 2, len(t))) * present
    highpass = signal.butter(2, 1300, "high", fs=SR, output="sos")
    tails = signal.sosfilt(highpass, taps * np.exp(-np.log(1000) * t / t60))
    tails /= np.linalg.norm(tails, axis=-1, keepdims=True)
    angle = 2 * np.pi * shift_hz * TIME
    wet = 0
    for share, tail in zip([np.cos(angle), np.sin(angle)], tails):
        wet = wet + signal.fftconvolve(x * share, tail, axes=1)[:, :N]
    return (x + gain_of(wet_db) * wet) / np.hypot(1, gain_of(wet_db))


# how far the left side leads, in the cut and once the blade is drawn out: (f/Hz, phase in radians)
PORT_PHASE = [(300, 0), (520, 1.36), (780, 2), (1300, 0.5), (1700, -1), (2400, -1.07), (2900, 3.5),
              (3700, 1.5), (4400, 7), (5000, 2), (7300, 4.5), (9300, 6), (10400, 6.5), (11800, 7),
              (15500, 7.5)]
DRAWN_PHASE = [(0, -1), (600, 0.58), (1210, 5.5), (1720, 7.5), (3600, 9), (4220, 6), (4820, 12), (5250, 10),
               (6370, 10), (9990, 12), (12600, 16.5), (14000, -1), (15500, 2.5)]
# how much stronger the left side is: (f/Hz, level/dB)
PORT_BALANCE = [(60, -4), (200, -0.5), (380, -5), (700, -3.5), (1290, 4), (2380, -4), (4400, 0), (8120, 1),
                (15000, 1.0)]
# where the tool is: (t/s, place with 0 = in the cut, 1 = drawn out)
PLACE = [(5.6, 0), (6.25, 1)]


def ports(x):
    """Two microphone ports hear the tool with different phase and strength; its place sets the phase."""
    hz, t, z = signal.stft(x, SR, nperseg=1024, noverlap=768)
    hz, side, place = hz[:, None], np.array([.5, -.5])[:, None, None], follow(PLACE, t)[0]
    turn = 0
    for k, phase in enumerate([PORT_PHASE, DRAWN_PHASE]):
        turn = turn + np.maximum(1 - abs(place - k), 0) * np.exp(1j * side * read(phase, hz))
    pair = gain_of(side * read(PORT_BALANCE, hz)) * np.exp(1j * np.angle(turn))
    return signal.istft(z * pair, SR, nperseg=1024, noverlap=768)[1][:, :N]


SKIP_DB = 4.5  # how much a full grip strengthens the sawing


def scene(skip_turns=0.11, tremor_db=.5):
    """One motor speed drives buzz, scrape, hum, whine and squeals, then the ports hear them all."""
    chatter = np.sqrt(1 - steadiness())
    speed = swing_rate() * (1 + .004 * chatter * wander(20))
    turns = np.cumsum(speed) / SR
    skip = skipping()
    # a catch delays and strengthens the strikes
    grip = (skip - uniform_filter1d(skip, size=SR // 5)) / skip.max()
    sawing = blade(turns - skip_turns * grip, speed)
    sawing = sawing * gain_of(SKIP_DB * grip + tremor_db * wander(25))
    tool = workshop(sawing + catch_tones(skip) + rings() + clicks() + switch_on())
    radiates = np.minimum(speed / 150, 1) ** 2  # slow swings move little air
    tool = tool + radiates * hum(turns, speed, chatter)
    # two layers of whine in step, each with its own waver
    tool = tool + gears(turns, speed) + gears(turns, speed)
    tool = tool + squeals(turns, speed) + bench(speed)
    return ports(tool) + room_tone()


EDGE_HZ = 15850  # top of the band


def record(dry):
    """The highest peaks are rounded off under full scale, then a low-pass filter limits the band."""
    limited = dry / (1 + (dry / .92) ** 6) ** (1 / 6)
    lowpass = signal.firwin(511, EDGE_HZ, window=("kaiser", 9), fs=SR)
    return signal.oaconvolve(limited, lowpass[None], "same")


dry = scene()
out = record(dry)
generate_wav(out)
```